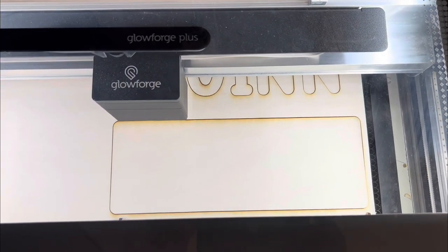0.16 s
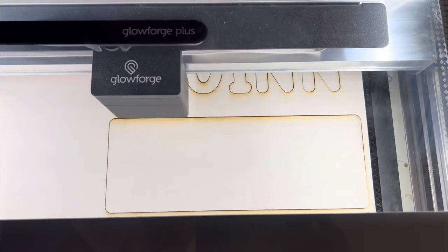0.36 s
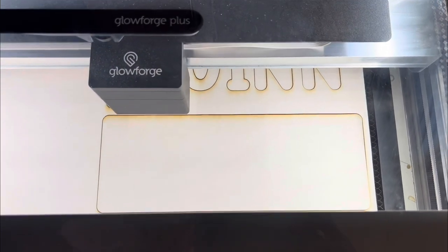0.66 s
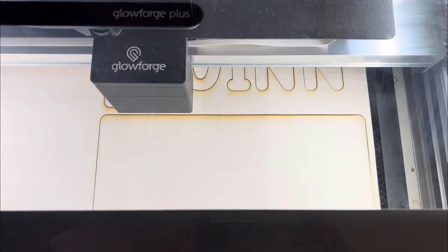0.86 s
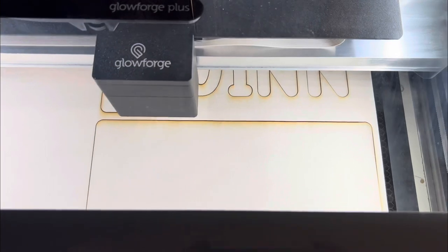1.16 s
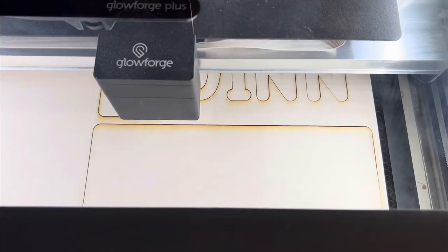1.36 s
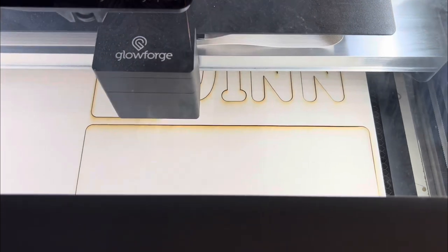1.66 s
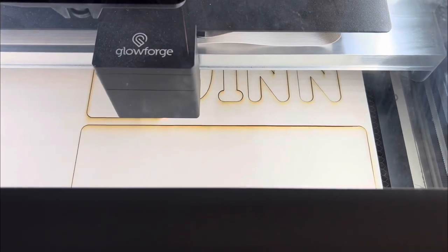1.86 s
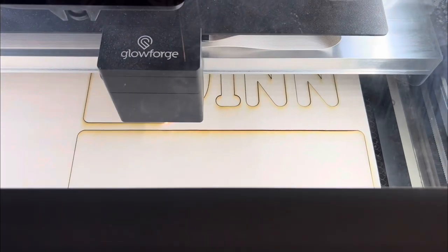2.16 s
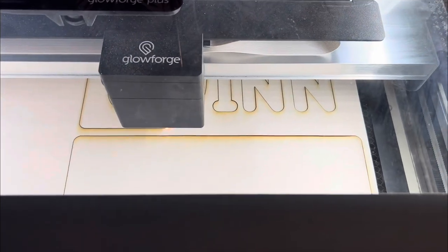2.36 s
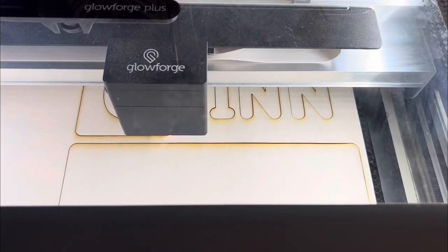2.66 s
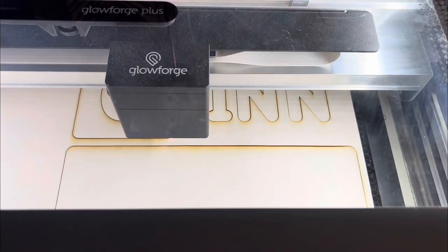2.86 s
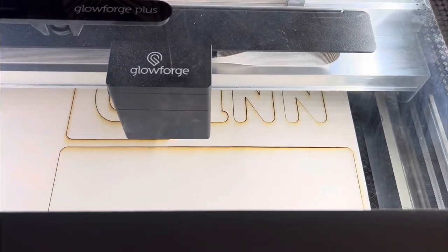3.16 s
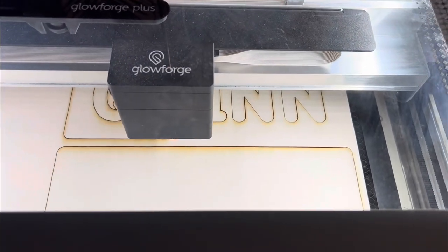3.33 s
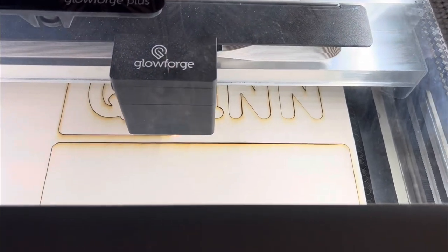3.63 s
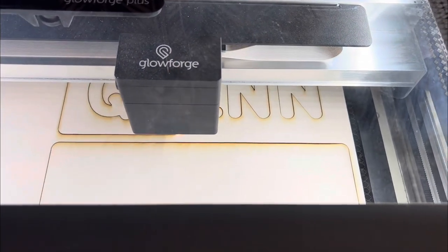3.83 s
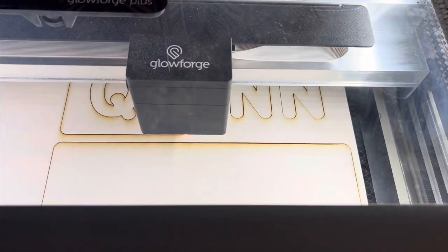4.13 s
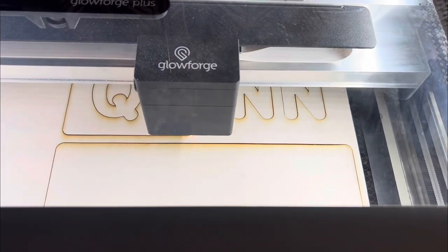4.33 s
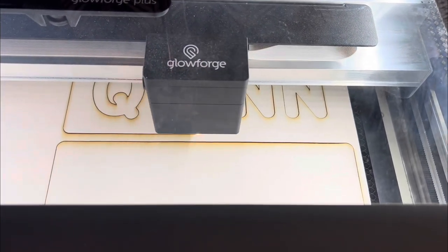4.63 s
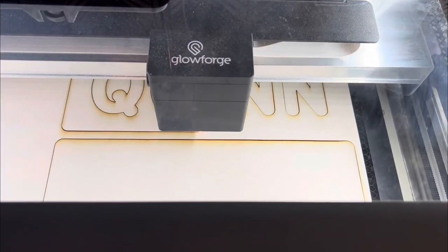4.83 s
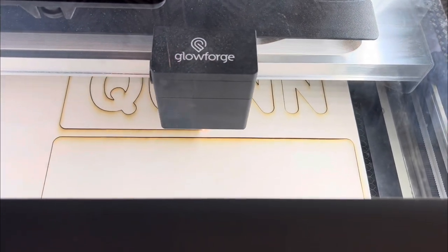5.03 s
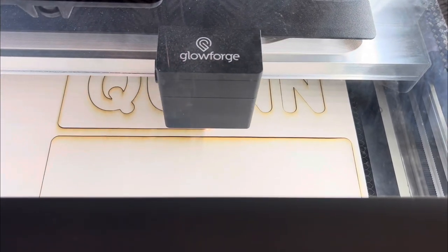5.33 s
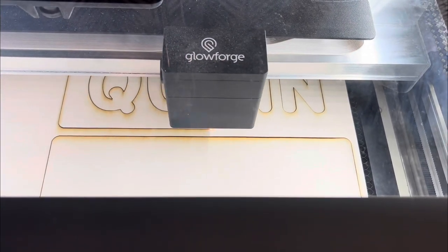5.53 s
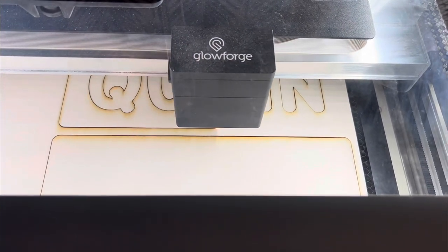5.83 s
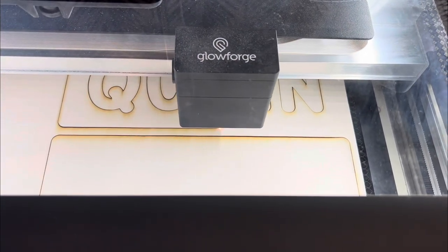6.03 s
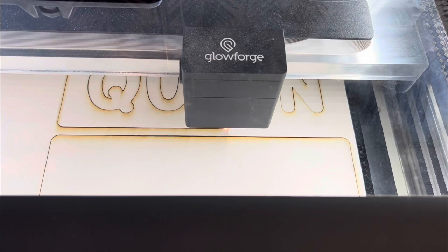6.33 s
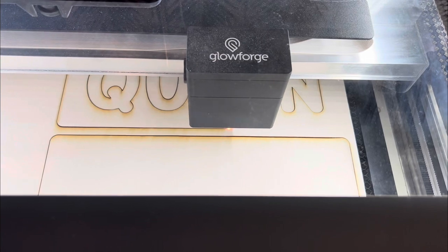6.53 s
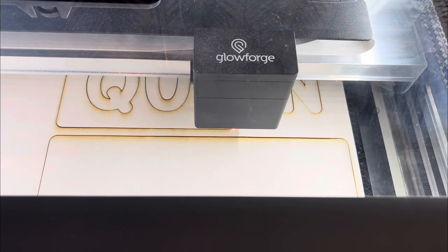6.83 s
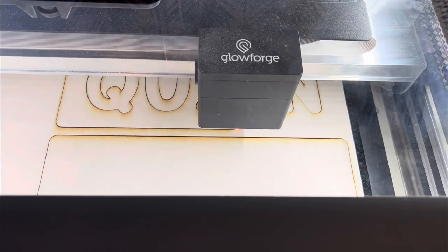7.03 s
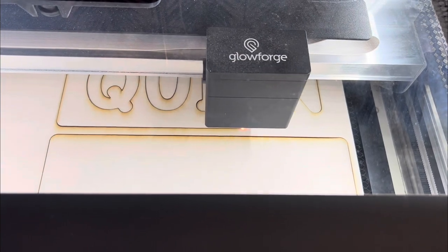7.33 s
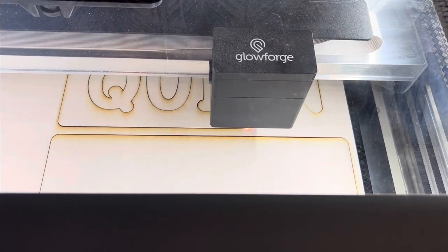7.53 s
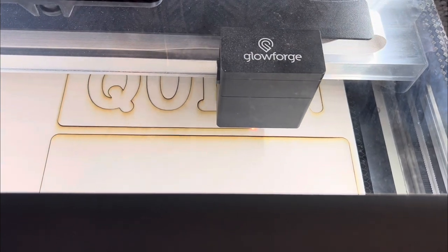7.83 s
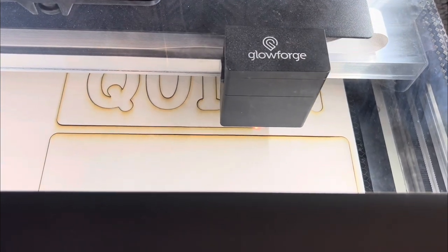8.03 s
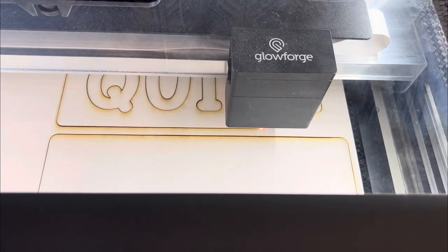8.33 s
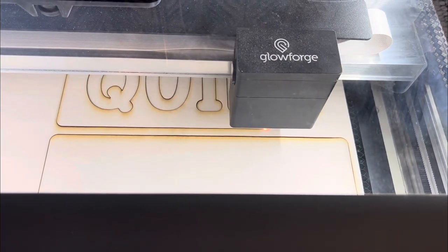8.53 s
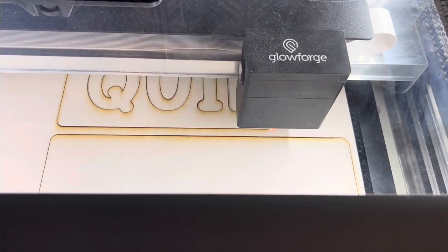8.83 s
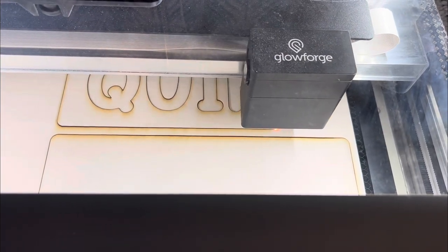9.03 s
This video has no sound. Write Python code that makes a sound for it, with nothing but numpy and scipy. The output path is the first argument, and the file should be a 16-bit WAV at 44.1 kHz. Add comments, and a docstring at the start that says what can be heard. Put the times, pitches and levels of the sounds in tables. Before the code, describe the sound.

Continuous exhaust and fan noise from a small enclosed cutting machine. A boxy low roar and broad hiss surround a fixed mid-pitched hum and a brighter whine about an octave higher, whose pitch drifts very slightly. Faint deep throbs come and go. The close hand-held stereo microphone moves at first, changing the tonal balance, then stays still. No distinct cutting hits or clicks.

```python
"""Under the glass lid of a desktop laser cutter at work, heard by a hand-held phone that settles above it.
Air rushes through the case as shaped noise and rings its low modes; low hums waver beneath.
A steady blower sounds a stack of sines, and a five-blade fan whines at a wandering speed.
Echoes in the case strengthen or cancel each tone as speed and position change, unlike at the two ports;
tables give the resulting levels and phases."""
import sys
import numpy as np
from scipy import signal
from scipy.fft import rfft, irfft, next_fast_len
from scipy.io import wavfile
from scipy.ndimage import uniform_filter1d, map_coordinates

SR = 44100
rng = np.random.default_rng(int(sys.argv[2]) if len(sys.argv) > 2 else 0)


def master(y):
    """Save y as 16-bit WAV."""
    cut = np.clip(np.atleast_2d(y).T, -1, 1)
    pcm = np.round(cut * 32767)  # scale
    wavfile.write(sys.argv[1], SR, pcm.astype(np.int16))


N = 404838

# Tone levels are rms dB averaged over the ports, before any waver; a level gap is left minus right.

# The phone's way. Each row: time in seconds, position from 0 (start) to 1 (rest).
PHONE_WAY = [(0, 0.027), (.3, .01), (.6, .11), (1, .3), (1.5, 0.82), (2.1, 0.98), (9.18, 1)]

# Rush shared by both ports. Each row: frequency in Hz, density in dB per Hz before AIR_FLOW.
AIR_SHARED = [(25, -103), (45, -80), (90, -77.5), (300, -65), (750, -66), (1100, -68.5), (1300, -70),
              (1800, -69), (2050, -69), (2350, -65), (2700, -73.5), (4000, -75.5), (6200, -78.5),
              (9000, -84.5), (12000, -92.5), (12600, -101), (14000, -100), (16000, -102)]
# Rush of opposite sign at the ports. Each row: frequency in Hz, density in dB per Hz before AIR_FLOW.
AIR_OPPOSED = [(40, -120), (200, -88), (550, -71.5), (900, -72), (1400, -74), (1850, -92), (2200, -75),
               (2700, -76), (3400, -80), (3900, -86), (5000, -85), (6000, -82), (9000, -88), (12000, -95.5),
               (12600, -103), (16000, -104)]
# Opposed rush that leads at the right port by a quarter cycle. Each row: frequency in Hz, power share 0 to 1.
AIR_QUARTER_SHARE = [(300, 0), (700, .25), (2500, .1), (5000, .15), (9000, .25), (15000, .2)]
# Changes of the rush. Each row: time in seconds, shared gain in dB, opposed gain in dB.
AIR_FLOW = [(0, 0, 0), (1, 0.5, 2), (2, 0.5, 2.5), (4, 0, 1.5), (6, 0, 1), (8, -0.5, 1.5), (9.18, -0.5, 1)]
# Air modes of the case. Each row: centre in Hz, width in Hz, peak density in dB per Hz before AIR_FLOW.
CASE_MODES = [(56, 11.9, -64), (118.7, 27, -63), (137, 13.4, -61.5), (210, 11.5, -60.5),
              (256.2, 19.3, -54.5), (275, 10, -60.5), (321, 24, -67), (380, 9.9, -77)]

# Wavering low tones. Each row: mean frequency in Hz, level in dB, left lead in radians.
LOW_HUMS = [(408.4, -54.5, .2), (557, -55.5, 0.78)]
# Swells of the deepest hum. Each row: time in seconds, level in dB.
DEEP_SWELLS = [(0.0, -51), (2.48, -45), (3.76, -51), (4.12, -42), (4.32, -57), (4.42, -44), (4.96, -55),
               (5.24, -40), (5.6, -52), (5.8, -40), (6.03, -55), (6.11, -40), (6.59, -53), (6.85, -46.5),
               (9.15, -44), (9.18, -47)]
DEEP_HZ = 58.3  # mean frequency

# Blower tones. Each row: multiple of the blower rate; at the start, level in dB, level gap in dB, left lead
# in radians, phase against the rest field in radians; at rest, level in dB at time 0, level gap in dB,
# left lead in radians, drift in dB per second.
BLOWER_TONES = [(1, -33.5, 1.7, -0.5, -0.25, -32.5, -.7, 0.34, -0.09),
                (2, -36, -6.8, -.8, 1.5, -44, 6, -3, -0.16),
                (3, -46, -3, -2.1, 0.8, -38, -0.5, -.15, -0.23), (4, -47, 0, 0.4, .1, -57, 0, -2, -.1),
                (5, -62, -1, -.3, -0.5, -39.5, -3, -0.5, -0.66),
                (6, -42.5, -5.6, .5, 2.5, -53.5, .3, -1, .1), (7, -56, -2, -1, -1.5, -56.5, -5, -.4, .3),
                (8, -61, 0, 0, .1, -64, 0, 0, .1)]
# Each entry: the power of the phone's position by which that blower tone changes (above 1 is later).
BLOWER_PACE = [1.01, 1.1, 1.01, .8, .3, 0.79, .9, .9]
BLOWER_HZ = 485.0

# Wandering fan speed. Each row: time in seconds, blade rate in Hz.
BLADE_RATE = [(0.0, 1104.6), (0.84, 1105.8), (1.36, 1097.9), (1.68, 1099.9), (2.12, 1104.1), (2.47, 1101.7),
              (2.99, 1104.3), (3.39, 1099.3), (3.63, 1100.6), (4.03, 1104.6), (4.23, 1103.5),
              (4.55, 1105.8), (4.87, 1098.3), (4.99, 1097.5), (5.27, 1097.9), (5.87, 1104.1),
              (6.23, 1101.4), (6.51, 1102.3), (6.78, 1105.6), (7.22, 1104.9), (7.62, 1107.2),
              (8.06, 1104.1), (8.46, 1104.7), (8.74, 1103.6), (8.94, 1105.3), (9.18, 1102.7)]
# Blade tones with the phone on its way. Each row: time in seconds, then level in dB, level gap in dB and
# left lead in radians for each of multiples 1 to 4.
ECHOES_ON_WAY = [(0.0, -34, -1.8, -1.2, -28.5, -13.7, -0.5, -49.2, -0.6, 2.0, -41.5, 0.7, 0.1),
                 (0.28, -31, -2.6, -0.9, -27.5, -13.7, -1, -44.4, 3.4, 3.3, -39, -0.2, -0.4),
                 (0.48, -34.5, -5.0, -0.9, -31, -11.7, -2.5, -43.8, 4.8, 3.9, -42, -4.0, -1.2),
                 (0.68, -33.5, -6.3, -0.4, -28.5, -20, -2.0, -39, 2.8, 4.5, -39.5, -4.7, -0.2),
                 (0.84, -31, -4.4, -0.1, -32.6, -4.9, -3, -36, -2.7, 5.4, -36.5, -7.4, 0.1),
                 (1.04, -30.0, -3.4, -0.1, -29, -12.4, -2.2, -40.5, -3.1, 6.1, -38.3, -9.8, -0.49),
                 (1.2, -26.5, -3.7, 0.0, -30, -3.4, 1, -48.0, 6.3, 3.7, -43.9, -4.1, -1.7),
                 (1.52, -26.5, -3.2, 0.54, -32, 4.3, 1.5, -43.4, -2.1, 2.5, -42, 1.4, -0.4),
                 (2.0, -28.5, -0.8, 0.94, -22.5, 2.9, 3, -45.8, 9, 3.8, -39, -7.2, 0.7)]
# Blade tones with the phone at rest. Each row: blade rate in Hz, then level in dB, level gap in dB and
# left lead in radians for each of multiples 1 to 4.
ECHOES_AT_REST = [(1097.5, -26.5, -3.96, 0.93, -30.5, 16.28, 1.2, -45, 7, 2.1, -45, -3.38, 3),
                  (1098.8, -27, -2.51, 0.94, -27.5, 12.36, 0.36, -41, 1.52, 3.19, -36.5, -6.67, 1.8),
                  (1100.7, -27, -1, 0.93, -26, 6.8, 0.35, -44, -0.0, 3.49, -38, -9.77, 1.57),
                  (1102.5, -27, -0.71, 0.95, -24.5, 3.6, 0.59, -44, 5.08, 4.05, -41.5, -4.21, 1.5),
                  (1103.5, -27.5, 0.7, 0.81, -25.5, 1.49, 0.74, -41, 8, 3.43, -39, -3.16, 0.7),
                  (1104.8, -28.1, 2.0, 0.73, -24.5, 1.19, 0.65, -40.5, 7.5, 2.61, -40, -3.75, -0.2),
                  (1106.4, -28, 2.62, 0.58, -26.5, 0.05, 1.05, -38.9, 0.04, 1.96, -48.5, -2, 0.5),
                  (1107, -29.5, 3.25, 0.52, -27.5, 0.42, 1.3, -39.48, -8, 1.96, -43.44, 0.5, 2)]
# Brief drops. Each row: time in seconds, multiple of the blade rate, half width in seconds, depth in dB.
BLADE_DIPS = [(.88, 2, .07, 5), (1.12, 4, .07, 10), (2.53, 4, .06, 12), (4.55, 4, .04, 12),
              (6.25, 4, 0.12, 7), (6.85, 4, .08, 8), (7.8, 4, .06, 6)]
# High whine. Each row: time in seconds, then level in dB for each of multiples 5 to 7.
WHINE_LEVELS = [(0.0, -50, -44, -40), (1.16, -42, -47.8, -44.5), (1.44, -43, -48, -49.0),
                (1.8, -44.3, -46.6, -39.5), (2.39, -42.0, -48.0, -51.4), (2.67, -42.5, -44, -49),
                (2.99, -45.5, -55, -44.1), (3.39, -52.1, -44, -54.8), (3.55, -52.4, -48, -51.0),
                (3.87, -47.1, -54.9, -47.4), (4.15, -50.8, -59, -52.6), (4.59, -42, -57.9, -44),
                (4.79, -55.9, -46.4, -54.2), (4.91, -49, -55.1, -41.2), (5.03, -46.5, -49.5, -39.9),
                (5.87, -48.6, -59.8, -51), (6.07, -50.3, -63.8, -49.9), (6.19, -54.3, -51.8, -51.3),
                (6.66, -46.6, -58.9, -49.1), (6.94, -48.4, -52.0, -46.0), (7.22, -50.6, -61.7, -53),
                (7.66, -40, -44, -40), (7.94, -49.7, -54, -49), (9.18, -53, -57.1, -51)]
# Weaker tones. Each row: level in dB at the start, at rest, slope in dB per Hz of blade rate, waver in dB.
WEAK_LEVELS = [(-60, -59.5, 0.6, 4), (-58.5, -68, .5, 6), (-38.5, -37, -0.3, 0.8), (-44, -53, 0.1, 1.1),
               (-46, -48.5, -1, 2)]
# Port gaps of the whine, then of the weaker tones. Each row: multiple of the blade rate, level gap in dB,
# left lead in radians; below multiple 1 the gaps are those at rest.
OVERTONE_PORTS = [(5, 2, -1.2), (6, .3, -1.3), (7, 0, -1.3), (8, 0, -1.3), (9, 0, -1.4), (.2, .3, 0),
                  (.8, 7, 2), (1.6, 0, 0)]
# Top of the whine. Each row: multiple of the blade rate, level in dB.
FAINT_TOP = [(10, -66), (11, -71), (12, -78), (13, -79), (14, -79)]
# Tones of unlike blades. Each row: multiple of a turn, level in dB, level gap in dB, left lead in radians.
SHAFT_TONES = [(11.96, -56.5, 3, 0.5), (15.8, -61, 0, 0), (26.1, -59.5, 6, -1.2), (30.9, -61, 2, -1.4)]
# Turbulent wakes. Each row: multiple of the blade rate, noise gain in dB at rest, noise knots per second.
WAKES = [(1, -42.5, 60), (2, -45, 130), (3, -46, 100), (4, -48, 110), (5, -50.5, 120), (6, -57, 120),
         (7, -57.5, 100), (8, -60, 120)]
BLADES, USUAL_HZ = 5, 1103  # blades, and the blade rate about which the weaker tones vary in level
REST_S, EASE_S = 1.96, 0.22  # seconds: the rest echoes have taken over, time taken to do so
WAKE_START_DB = -3  # the wakes where the phone starts, against at rest
# level waver in dB of blade multiples 1 to 4: fast at 28 knots a second, slow at 7
BLADE_WAVER = [(0.65, 0.45), (0.83, 0.6), (2.3, 2.1), (1.7, 1.4)]
TOP_HZ = 15714  # band limit of the phone


def amp(db):
    """Logarithmic levels: decibels become a linear gain."""
    return 10 ** (np.asarray(db) / 20)


def unit(x):
    """Normalisation of power: scales a signal to rms 1."""
    return x / np.sqrt(np.mean(x ** 2) + 1e-20)


def along(points, hz):
    """Spectral interpolation: (Hz, value) points joined along a logarithmic axis."""
    f, v = np.transpose(points)
    return np.interp(np.log(hz + 1), np.log(f + 1), v)


def curves(rows):
    """Linear interpolation in time: one curve for each column after the seconds."""
    s, *columns = np.transpose(rows)
    return [np.interp(np.arange(N) / SR, s, column) for column in columns]


def wobble(rate):
    """Slow random modulation: normal random knots, rate of them a second, joined by lines."""
    knots = rng.standard_normal(int(N * rate / SR) + 4)
    return map_coordinates(knots, [np.arange(N) * rate / SR], order=1)


def filtered(x, response):
    """Linear filtering: the spectrum is multiplied by a response of frequency."""
    m = next_fast_len(N + 8192)
    return irfft(rfft(x, m) * response(np.fft.rfftfreq(m, 1 / SR)), m)[..., :N]


def angle(hz):
    """Phase as the running integral of frequency."""
    return np.cumsum(np.asarray(hz)) * 2 * np.pi / SR


def place():
    """Position of the listener along its way, 0 to 1."""
    return curves(PHONE_WAY)[0]


def ports(db, pan_db, lead):
    """Sound field at two points: complex gains of mean level db with a level gap and a phase gap."""
    left_power = amp(pan_db) ** 2 / (1 + amp(pan_db) ** 2)
    left = np.sqrt(left_power) * np.exp(0.5j * lead)
    right = np.sqrt(1 - left_power) * np.exp(-0.5j * lead)
    pair = np.broadcast_arrays(left, right, db)[:2]
    return 2 * amp(db) * np.reshape(pair, (2, -1))


def tone(phase, db, pan_db, lead):
    """Simple harmonic motion: a sine received at two ports."""
    return (ports(db, pan_db, lead) * np.exp(1j * phase)).real


def moving(phase, start, turn, rest, pace):
    """Superposition: a sine's start field gives way to its rest field; where they oppose, it dips."""
    way = place() ** pace
    field = (1 - way) * ports(*start) * np.exp(1j * turn) + way * ports(*rest)
    return (field * np.exp(1j * phase)).real


def air_response(hz):
    """Resonance: the case's modes add their power to the spectrum of the shared rush."""
    modes = sum(amp(db) ** 2 / (1 + (2 * (hz - centre) / width) ** 4) for centre, width, db in CASE_MODES)
    shared = np.sqrt(amp(along(AIR_SHARED, hz)) ** 2 + modes)
    return [shared, amp(along(AIR_OPPOSED, hz))]


def air():
    """Turbulent flow noise: broadband, in faint patches of time and frequency, partly opposed at the ports."""
    z = signal.stft(rng.standard_normal((2, N)), nperseg=512)[2]
    patches = uniform_filter1d(rng.standard_normal(z.shape[1:]), size=6, axis=0)
    patches = unit(uniform_filter1d(patches, size=14, axis=1))
    noise = signal.istft(z * amp(0.87 * patches), nperseg=512)[1][:, :N]
    noise = unit(noise) * np.sqrt(SR / 2)  # unit power per Hz
    # part of the opposed rush is the shared noise turned by a quarter cycle
    quarter = filtered(noise[0], lambda hz: -1j * np.sqrt(along(AIR_QUARTER_SHARE, hz)))
    separate = filtered(noise[1], lambda hz: np.sqrt(1 - along(AIR_QUARTER_SHARE, hz)))
    pair = np.array([noise[0], quarter + separate])
    shared, opposed = filtered(pair, air_response) * amp(curves(AIR_FLOW))
    return np.array([shared + opposed, shared - opposed])


def hums():
    """Frequency and amplitude modulation: low tones waver in pitch and level; the deepest throbs most."""
    deep_db = curves(DEEP_SWELLS)[0] + 2.6 * wobble(9)
    out = tone(angle(DEEP_HZ + 2.51 * wobble(7)), deep_db, 0, 0)
    for hz, db, lead in LOW_HUMS:
        out = out + tone(angle(hz + 1.22 * wobble(3)), db + 4 * wobble(1.51), 0, lead)
    return out


def blower():
    """Harmonic series: a steady rotation sounds whole multiples, the higher ones fluttering more."""
    s = np.arange(N) / SR
    spin = angle(np.full(N, BLOWER_HZ)) + 0.032 * wobble(30)
    out = 0
    for (k, *start, turn, db, pan_db, lead, drift), pace in zip(BLOWER_TONES, BLOWER_PACE):
        flutter = amp(0.38 * k * wobble(20) + 0.1 * k * wobble(2.47))
        out = out + flutter * moving(k * spin, start, turn, (db + drift * s, pan_db, lead), pace)
    return out


def blade_tones(blade, blade_hz):
    """Interference: echoes set the level and phase of blade multiples 1 to 4 by position and speed."""
    s = np.arange(N) / SR
    still = np.clip((s - REST_S) / EASE_S + 1, 0, 1)
    rates, *columns = np.transpose(ECHOES_AT_REST)
    heard = []
    for on_way, column in zip(curves(ECHOES_ON_WAY), columns):
        at_rest = np.interp(blade_hz, rates, column)
        heard.append(on_way + still * (at_rest - on_way))
    for dip_s, k, half, depth_db in BLADE_DIPS:
        heard[3 * round(k) - 3] -= depth_db * np.exp(-((s - dip_s) / half) ** 2)
    out = 0
    for i, (fast_db, slow_db) in enumerate(BLADE_WAVER):
        db, pan_db, lead = heard[3 * i:3 * i + 3]
        db = db + fast_db * wobble(28) + slow_db * wobble(7)
        out = out + tone((i + 1) * blade, db, pan_db, lead)
    return out


def overtones(blade, blade_hz):
    """Periodic pulses: higher multiples form the whine, and weaker tones lie at other multiples."""
    levels = [db + 2.1 * wobble(6) for db in curves(WHINE_LEVELS)]
    for start_db, rest_db, slope, waver_db in WEAK_LEVELS:
        db = start_db + (rest_db - start_db) * place() + slope * (blade_hz - USUAL_HZ)
        levels.append(db + waver_db * wobble(3))
    out = 0
    for (k, pan_db, lead), db in zip(OVERTONE_PORTS, levels):
        facing = place() if k < 1 else 1  # the low tones start out alike at both ports
        lead = lead * facing + 0.04 * k * wobble(3)
        out = out + tone(k * blade, db + 0.3 * k * wobble(16), pan_db * facing, lead)
    for k, db in FAINT_TOP:
        out += tone(k * blade, db + 3 * wobble(3) + 2.5 * wobble(25), 0, -1.4)
    return out


def shaft_tones(blade):
    """Broken symmetry: unlike blades sound multiples of a whole turn."""
    return sum(tone(k * blade / BLADES, db + 3 * wobble(2.7), pan_db, lead)
               for k, db, pan_db, lead in SHAFT_TONES)


def wakes(blade):
    """Narrow-band noise: turbulent wakes modulate each multiple, partly each port on its own."""
    out = 0
    for k, db, knots_per_s in WAKES:
        own = np.array([wobble(knots_per_s), wobble(knots_per_s)])
        noise = wobble(knots_per_s) * np.cos(k * blade) + 0.85 * own * np.sin(k * blade)
        out = out + amp(db + WAKE_START_DB * (1 - place())) * noise
    return out


def fan():
    """Blade passing: aligned multiples of one rate, their shared timing shaken by turbulence."""
    blade_hz, = curves(BLADE_RATE)
    blade = angle(blade_hz) + 0.051 * wobble(60)
    return blade_tones(blade, blade_hz) + overtones(blade, blade_hz) + shaft_tones(blade) + wakes(blade)


def scene():
    """Linear superposition: all sources add at the two ports."""
    return air() + hums() + blower() + fan()


def record(dry):
    """Band limitation: the phone keeps nothing above its band limit."""
    return filtered(dry, lambda hz: hz < TOP_HZ)


dry = scene()
out = record(dry)
master(out)
```